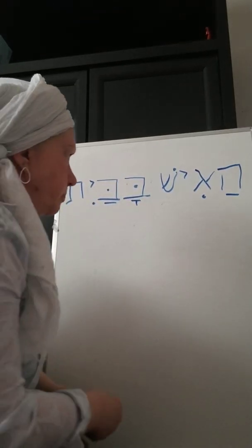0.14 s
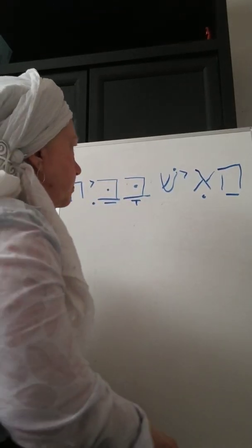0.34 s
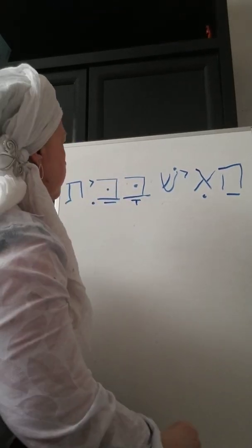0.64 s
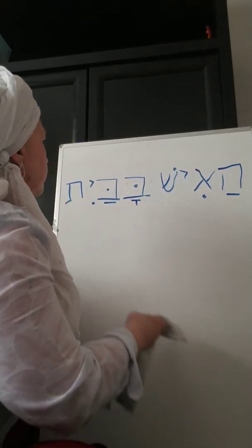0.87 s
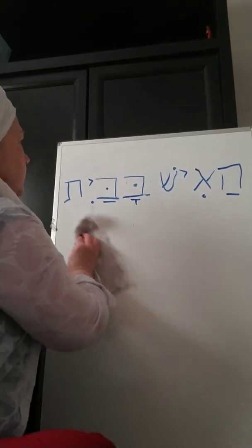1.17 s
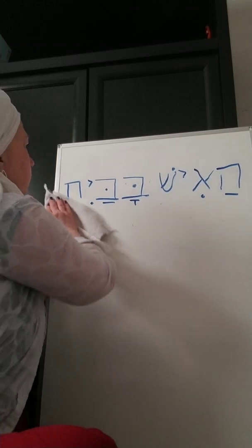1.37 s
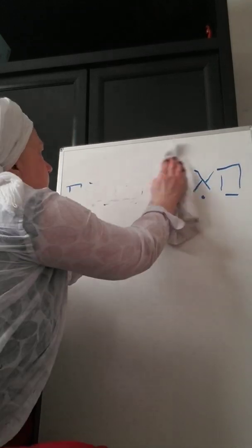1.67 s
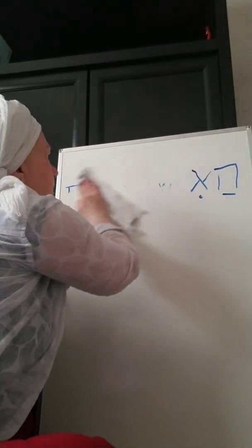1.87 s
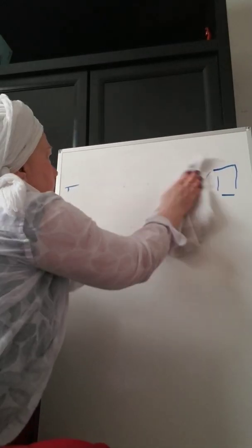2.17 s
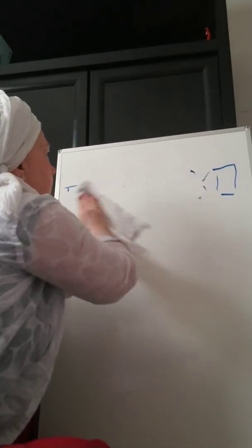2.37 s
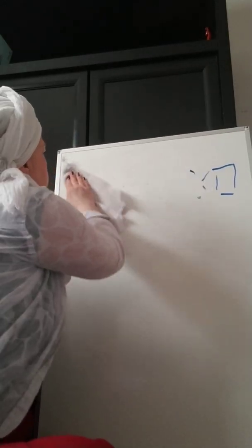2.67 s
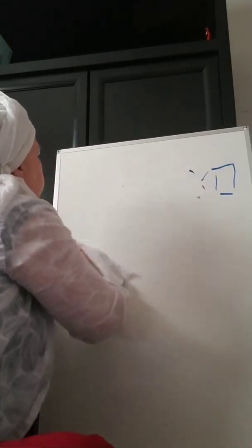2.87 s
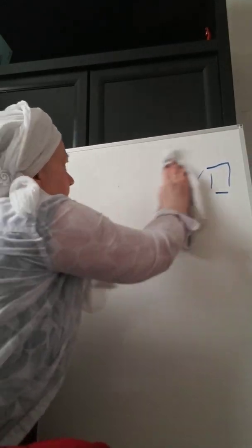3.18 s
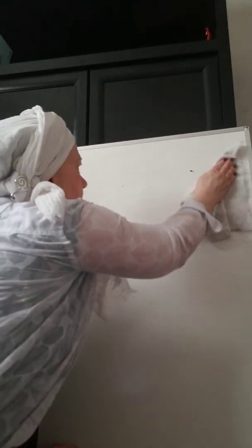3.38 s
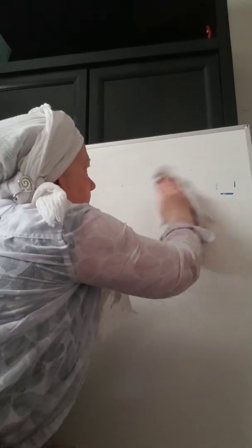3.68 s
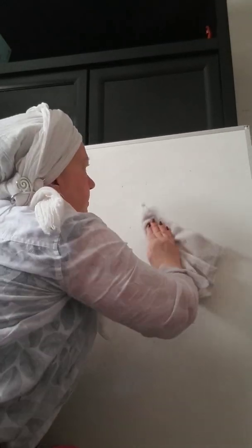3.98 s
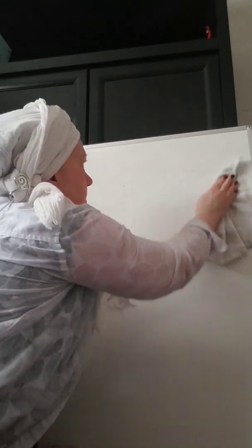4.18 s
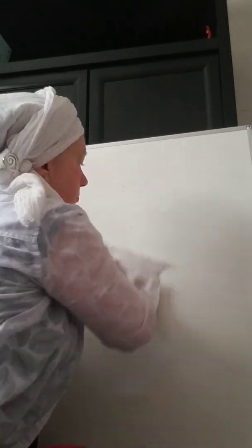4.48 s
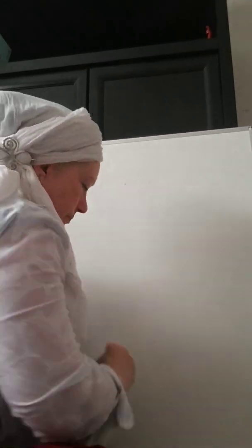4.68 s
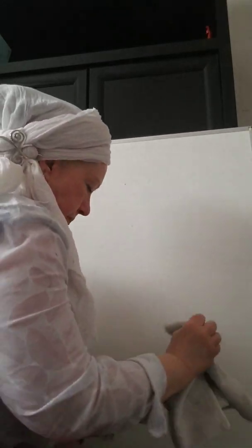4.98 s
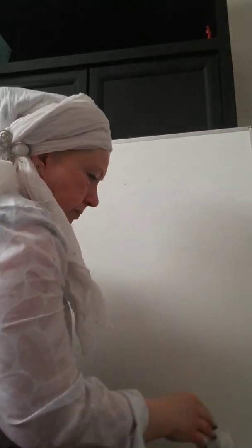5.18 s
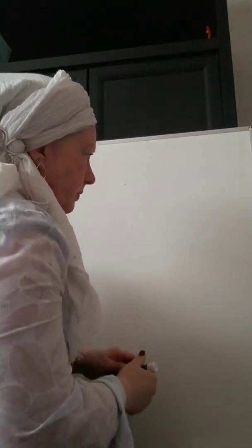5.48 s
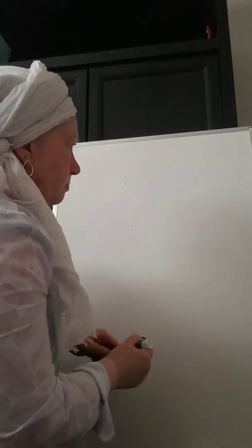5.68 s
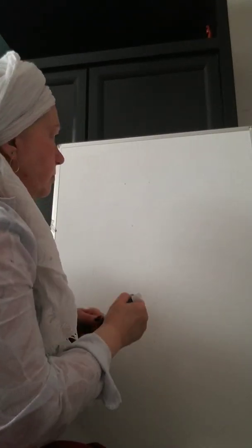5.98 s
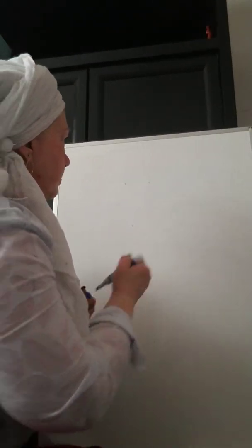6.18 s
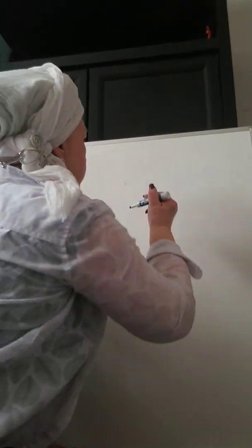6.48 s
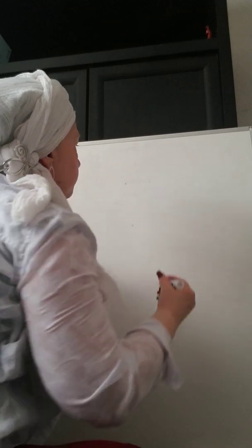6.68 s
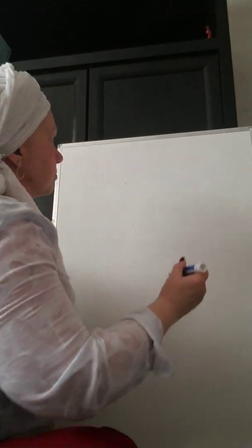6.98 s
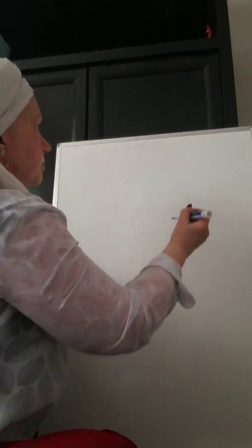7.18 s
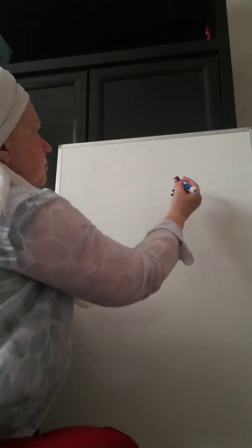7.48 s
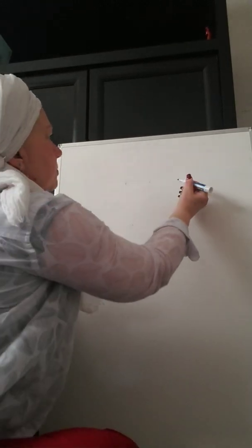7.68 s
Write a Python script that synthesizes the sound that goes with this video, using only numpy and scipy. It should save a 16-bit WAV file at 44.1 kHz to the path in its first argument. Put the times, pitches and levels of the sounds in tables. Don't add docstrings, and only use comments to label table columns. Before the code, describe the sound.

Quick swishing wipes across a hollow, rattling whiteboard in a quiet small room, followed by a dropped cloth, a cap click and felt-tip dabs.

```python
import sys
import numpy as np
from scipy import signal
from scipy.fft import rfft, irfft, next_fast_len
from scipy.io import wavfile
from scipy.ndimage import uniform_filter1d

SR = 44100
rng = np.random.default_rng(int(sys.argv[2]) if len(sys.argv) > 2 else 0)


def dump(signal):
    limited = np.clip(np.atleast_2d(signal).T, -1, 1)
    pcm = np.round(limited * 32767).astype(np.int16)
    wavfile.write(sys.argv[1], SR, pcm)


def ratio(d):
    e = np.asarray(d, float) / 20
    return 10 ** e


N = 346135


def unit(x):
    return x / np.sqrt(np.mean(x ** 2) + 1e-20)


def along(points, hz):
    f, v = np.transpose(points)
    return np.interp(np.log(hz + 1), np.log(f + 1), v)


def closed(points, hz):
    low_end, high_end = (points[0][0] * 0.7, -60), (points[-1][0] * 1.3, -60)
    return ratio(along([low_end, *points, high_end], hz))


def constant(value):
    return lambda f: 0 * f + value


def modes(table, f):
    total = 0
    for k, (center_hz, width_hz, db) in enumerate(table):
        damping = 1j * f * width_hz
        total = total + (-1) ** k * ratio(db) * damping / (center_hz ** 2 - f * f + damping + 1e-9)
    return total


def filtered(x, response):
    m = next_fast_len(x.shape[-1] + 8192)
    spectrum = rfft(x, m) * response(np.fft.rfftfreq(m, 1 / SR))
    return irfft(spectrum, m)[..., :x.shape[-1]]


def plain_noise(gain):
    return unit(filtered(rng.standard_normal((2, N)), gain))


def noise(gain, patchy_db):
    z = signal.stft(rng.standard_normal((2, N)), nperseg=512)[2]
    field = uniform_filter1d(rng.standard_normal(z.shape[1:]), size=6, axis=0)
    field = uniform_filter1d(field, size=8, axis=1)
    patchy = signal.istft(z * ratio(patchy_db * unit(field)), nperseg=512)[1][:, :N]
    return unit(filtered(patchy, gain))


def steady(x, share=0.92):
    power = np.abs(uniform_filter1d(x[0] ** 2, size=SR // 16))
    return unit(x / (power + 0.023) ** (share / 2))


def gestures(s, hold, db, rise, fall, bend=0.):
    grid = np.arange(0, N + 96, 96)
    t = grid[:, None] / SR - s
    before, after = np.maximum(-t, 0), np.maximum(t - hold, 0)
    level_db = db - rise * before - fall * after - bend * (before + after) ** 2
    power = np.sum(ratio(2 * np.maximum(level_db, -140)), axis=1)
    return np.interp(np.arange(N), grid, np.sqrt(power))


def burst(size, gain, t60, swell, crack=0., early=0., blow=0., count=SR // 2):
    hz, t, z = signal.stft(rng.standard_normal((2, count)), SR, nperseg=size)
    decay = ratio(-60 * t / t60(hz)[:, None])
    onset = 1 - np.exp(-(t + 0.00082) / swell(hz)[:, None])
    quick = 1 + early * ratio(-60 * t / 0.06)
    pair = signal.istft(z * decay * onset * quick, SR, nperseg=size)[1][:, :count]
    first = crack * ratio(-60 * np.arange(count) / SR / 0.0025) * rng.standard_normal(pair.shape)
    first[0, SR // 1500] += blow
    highpass = signal.butter(2, 500, "high", fs=SR, output="sos")
    pair = filtered(pair + signal.sosfilt(highpass, first), gain)
    loudness = uniform_filter1d(np.mean(pair ** 2, axis=0), size=SR // 50)
    return pair / np.sqrt(np.max(loudness))


def add(track, s, sound):
    room = track[:, round(s * SR):][:, :sound.shape[1]]
    room += sound[:, :room.shape[1]]


# freq_hz, density_db
HISS = [(1500, -5), (2300, -6), (3300, -9), (4300, -8), (5900, -7), (7500, -8), (8700, -12), (10500, -10),
        (11700, -8), (12300, 0), (13500, -1), (14500, -2.5), (15800, -3)]


def microphone_hiss():
    return ratio(-75 + 3.0) * noise(lambda f: closed(HISS, f), patchy_db=0.8)


# freq_hz, density_db
AIR = [(160, -2.5), (260, 0), (400, -6.5), (700, -8), (1500, -10.5)]


def room_air():
    return ratio(-77.0) * plain_noise(lambda f: closed(AIR, f))


# center_hz, width_hz, level_db
BUILDING = [(29, 12, -10), (50.1, 6, 0), (72, 16, -9.5), (95, 16.2, -4), (132.4, 33, -14.5)]


def building_rumble():
    rumble = plain_noise(lambda f: modes(BUILDING, f) / (1 + (f / 130) ** 4))
    return ratio(-61.5) * steady(rumble, share=0.75)


# start_s, level_db, top_hz, swell_s, t60_s
THUDS = [(0.345, -53, 284, 0.049, 0.36), (1.56, -43, 526, 0.0083, 0.33), (2.549, -65.5, 358, 0.02, 0.37),
         (3.601, -59.5, 450, 0.004, 1), (5.052, -54, 379, 0.029, 0.26), (6.12, -63, 350, 0.0026, 0.15),
         (6.37, -66.5, 485, 0.019, 0.38), (6.469, -58, 690, 0.065, 0.29), (6.73, -64.5, 447, 0.066, 0.25),
         (7.0, -77, 910, 0.081, 1), (7.221, -61.5, 1570, .03, 0.2), (7.36, -58, 800, 0.018, 0.21),
         (7.632, -63.5, 500, 0.011, 0.16)]
# start_s, level_db, center_hz, width_hz, t60_s
FLOP = (4.968, -62, 660, 220, .25)


def pushing():
    out = np.zeros((2, N))
    for s, db, top_hz, swell_s, t60_s in THUDS:
        gain = lambda f: closed([(140, 0), (top_hz, -6), (top_hz * 1.54, -20)], f)
        add(out, s, ratio(db) * burst(230, gain, constant(t60_s), constant(swell_s)))
    s, db, hz, width_hz, t60_s = FLOP
    cavity = lambda f: modes([(hz, width_hz, 0)], f) ** 2
    add(out, s, ratio(db) * burst(128, cavity, constant(t60_s), constant(0.087)))
    return out


# center_hz, width_hz, level_db
BENDING = [(46.75, 5.05, 0.5), (63.1, 11, -1), (95.3, 18, -1.5), (124.75, 13.8, -1.5), (148.3, 16.6, -5.5)]
# start_s, hold_s, boom_db, drum_db
PUSHES = [(0.388, 0.023, -55.5, -49.5), (1.038, 0.03, -48, -47.5), (1.558, 0.01, -34, -33),
          (1.75, 0.14, -44, -46), (2.193, 0.028, -48, -42), (2.29, 0.028, -46.5, -48),
          (2.425, 0.022, -52, -50), (2.634, 0.018, -49.5, -60.5), (2.83, 0.016, -50.5, -58.5),
          (3.06, .02, -52, -41.5), (3.174, 0.018, -46, -58), (3.437, 0.036, -39, -41.5),
          (3.603, 0.025, -49.5, -46.5), (3.785, 0.017, -51, -46), (3.973, 0.0096, -27.5, -29.5),
          (4.142, .02, -45, -45), (4.358, .02, -32.5, -32.5), (4.39, 0.035, -30.5, -36.5),
          (4.566, 0.008, -47, -43), (5.067, 0.015, -59.5, -51.5), (5.138, 0.31, -57.5, -77),
          (5.705, 0.3, -56.5, -68.5), (6.387, 0.037, -55.5, -70), (6.482, .02, -56, -56),
          (6.62, 0.052, -61.5, -71), (6.92, 0.13, -58.5, -70.5), (7.383, 0.032, -67, -55),
          (7.494, 0.18, -54, -60.5), (7.802, 0.043, -54, -61.5)]
# start_s, hold_s, boom_db, drum_db
JOLTS = [
    (1.209, 0.055, -51, -45),
    (1.436, 0.016, -36.5, -34),
    (3.023, 0.038, -39, -43),
    (3.877, 0.052, -35.5, -29),
    (4.308, 0.023, -27, -32),
]
PUSH_RISE_DB_S, JOLT_RISE_DB_S = 174.5, 904.5
BOOM_FALL_DB_S, DRUM_FALL_DB_S = 111, 134


def swaying():
    s, hold, boom_db, drum_db = np.transpose(PUSHES + JOLTS)
    rise = np.repeat([PUSH_RISE_DB_S, JOLT_RISE_DB_S], [len(PUSHES), len(JOLTS)])
    boom = steady(plain_noise(lambda f: modes(BENDING[:2], f) ** 2))
    drum = steady(noise(lambda f: modes(BENDING[2:], f) ** 2, patchy_db=-4.5), share=0.89)
    booming = gestures(s, hold, boom_db + 0.5, rise, BOOM_FALL_DB_S)
    drumming = gestures(s, hold, drum_db, rise, DRUM_FALL_DB_S)
    return booming * boom + drumming * drum


# freq_hz, density_db
CLOTH = [(1060, -29), (1800, -7), (1940, -13), (2660, -6), (3280, -6), (6030, -1.5), (7430, -1.5),
         (8910, -4.5), (10000, -1.5), (11200, -6), (12500, -3.5), (15000, -12), (15800, -18.5)]
# freq_hz, density_db
COARSE = [(150, -6), (500, -1), (1500, -2), (2600, -5), (3700, -13), (5500, -28)]
# full_speed_s, hold_s, hiss_db, rustle_db
STROKES = [(1.091, 0.039, -62.5, -74), (1.259, 0.046, -57.5, -61), (1.42, .02, -60, -68),
           (1.531, 0.081, -52, -56), (1.766, 0.068, -54, -62.5), (2.016, 0.097, -54, -71.5),
           (2.238, 0.081, -55, -72), (2.453, 0.058, -59.5, -85), (2.67, 0.099, -56.5, -83),
           (2.975, 0.071, -55, -67), (3.097, 0.11, -55, -64.5), (3.403, 0.048, -53.5, -68),
           (3.613, 0.11, -56, -72.5), (3.83, 0.077, -54, -76.5), (4.026, 0.056, -55, -82),
           (4.197, 0.081, -58.5, -96)]
# full_speed_s, hold_s, hiss_db, rustle_db
LAST_STROKE = (4.5, 0.1, -56.5, -51)
SHEEN_DB = [0.5, -2, -2.8, -2.5, 1, -0.2, 2.3, -2.8, -1.5, -0.5, -1.8, 3, 3.5, 0.5, 2.5, -1, 2]
# start_s, hold_s, hiss_db, rustle_db
RUSTLES = [(0.971, 0.0071, -67, -69), (5.05, 0.0043, -78, -75), (5.085, 0.026, -74, -86),
           (5.488, 0.074, -73.5, -99), (5.828, 0.0065, -80, -76), (6.149, 0.012, -67, -64.5),
           (6.242, 0.22, -75.5, -77.5), (6.453, 0.0098, -72, -72.5), (6.495, 0.043, -73.5, -72),
           (7.064, 0.077, -75.5, -79), (7.2, 0.03, -76, -70.5), (7.7, 0.026, -71, -86)]
# start_s, hold_s, hiss_db, rustle_db
LIFT = (4.45, .02, -61, -67)
# start_s, hold_s, level_db, rise_db_s, fall_db_s
SLEEVE = (.6, .2, -74, 30, 90)
# start_s, hold_s, hiss_db, rustle_db, fall_db_s
SLAPS = [
    (3.18, 0.058, -68.5, -71, 300),
    (4.296, 0.028, -56.5, -59, 402),
    (4.995, 0.033, -61.5, -71, 260),
    (6.495, 0.083, -74, -56, 330),
    (6.742, 0.048, -75.5, -68, 220),
    (6.804, 0.04, -70, -81, 300),
]
SLAP_RISE_DB_S = [300, 2500, 4000, 350, 150, 400]
STROKE_RISE_DB_S, STROKE_FALL_DB_S = 96, 123.5
STROKE_BEND_DB_S2 = 902.5
FOLD_RISE_DB_S, FOLD_FALL_DB_S = 115, 85
RUSTLE_RISE_DB_S, RUSTLE_FALL_DB_S = 386.5, 99.5
SHEEN_HZ = 8700


def rubbing():
    fine = noise(lambda f: closed(CLOTH, f), patchy_db=1.8)
    coarse = noise(lambda f: closed(COARSE, f), patchy_db=-0.5)
    top = filtered(fine, lambda f: 1 / (1 + (SHEEN_HZ / (f + 1)) ** 6))

    s, hold, hiss_db, fold_db = np.transpose(STROKES + [LAST_STROKE])
    stroke = lambda db: gestures(s, hold, db, STROKE_RISE_DB_S, STROKE_FALL_DB_S, STROKE_BEND_DB_S2)
    wiping = stroke(hiss_db + 2.5) * (fine - top)
    wiping += stroke(hiss_db + 5.5 + np.array(SHEEN_DB)) * top
    folds = gestures(s, hold, fold_db, FOLD_RISE_DB_S, FOLD_FALL_DB_S) * coarse
    sleeve = gestures(*SLEEVE) * fine

    loose_s, loose_hold, loose_hiss_db, loose_fold_db = np.transpose(RUSTLES + [LIFT])
    loose = lambda db: gestures(loose_s, loose_hold, db, RUSTLE_RISE_DB_S, RUSTLE_FALL_DB_S)
    rustling = loose(loose_hiss_db + 6.0) * fine + loose(loose_fold_db) * coarse

    slap_s, slap_hold, slap_db, bunch_db, fall = np.transpose(SLAPS)
    slap = lambda db: gestures(slap_s, slap_hold, db, np.array(SLAP_RISE_DB_S), fall)
    slapping = slap(slap_db + 6.5) * fine + slap(bunch_db) * coarse
    return wiping + folds + sleeve + rustling + slapping


# start_s, peak_db, low_part_rel_db, ringing_hz
CLICKS = [(0.952, -54, -24, 6500), (1.055, -45, -10, 6000), (1.235, -49, -11, 6200),
          (1.419, -41, -20, 6700), (1.494, -44, -16, 6700), (2.154, -61, 22, 5630),
          (3.8594, -31, -5.5, 6670), (3.867, -36, -9.5, 6740), (3.911, -33.5, -7, 6750),
          (3.9354, -38, 0, 6230), (3.9918, -43, -8, 6700), (4.138, -52.5, 11, 7730),
          (4.2898, -37, -8.5, 6850), (4.2973, -39.5, -9, 8500), (4.311, -34, -1.5, 6600),
          (4.359, -61.5, 1, 6700), (4.996, -38.5, -25, 6450), (5.0059, -39, -14.5, 9900),
          (5.097, -60, -17, 8950), (5.448, -53, -42, 6100), (6.1195, -43, 1, 9940),
          (6.2105, -56.5, -42, 9700), (6.458, -48, -28, 6700), (7.201, -56.5, -20, 9700),
          (7.344, -51.5, -11, 9700), (7.6073, -57, -31, 6500), (7.8008, -36.5, -30, 5360),
          (7.8072, -34, -15, 9700), (7.8083, -42, -13, 4900), (7.8104, -39, -24, 9000),
          (7.8222, -61.5, -16, 8000)]
# freq_hz, density_db
TICK = [(3000, -8.5), (5200, -3), (8000, -5.5), (12500, -7.5), (15800, -19.5)]
# center_hz, width_hz, level_db
CAP = [(620, 200, -2.5), (1607, 204, -0.5), (2080, 610, -0.5), (2760, 800, 0), (4070, 1300, -6)]
CLICK_ROOM_DB, CLICK_T60_S = -12, 0.21
HOLLOW_ROOM = 0.045


def clicking():
    out = np.zeros((2, N))
    for s, db, low_db, hz in CLICKS:
        broad = lambda f: closed(TICK, f) + ratio(low_db + 14.5) * modes(CAP, f) ** 2
        pitched = lambda f: broad(f) + 1.7 * modes([(hz, 1300, 0)], f) ** 2
        tick = burst(32, pitched, constant(0.014), constant(0.00056), crack=2.0, count=SR // 16)
        add(out, s, ratio(db - 7.0 + np.clip(low_db, 0, 7)) * tick)
        answer = burst(70, broad, constant(CLICK_T60_S), constant(0.005), count=SR // 8)
        add(out, s, ratio(db + CLICK_ROOM_DB + HOLLOW_ROOM * low_db) * answer)
    return out


# start_s, peak_db, bass_rel_db, body_rel_db, edge_rel_db
KNOCKS = [(0.985, -47.5, 3.5, -0.5, -10), (1.018, -51, -2, 3, -6), (1.055, -45.5, -5.5, -9, -11),
          (1.193, -52, -5, -3.5, -15), (1.199, -42.5, 0, -7, -22), (1.292, -47, -12, -5, -2),
          (1.42, -30.5, 3.5, -9, -10), (1.494, -28.5, -9.5, 0, -19.5), (1.507, -25, -6, -12.5, -17.5),
          (1.763, -34, -3, -16, -36), (1.775, -34.5, 0.5, -16, -29), (2.1543, -41, -9, -7, -12.5),
          (2.241, -35.5, -0.5, -12.5, -40), (2.9877, -39, 0, -4, -14), (3, -33, 3.5, -9, -27),
          (3.392, -37.5, 2.5, -14, -34), (3.416, -32, -5.5, -8.5, -20.5), (3.859, -20.5, 0, -8.5, -20),
          (3.91, -21.5, -2.5, 5, -24.5), (3.929, -21, -7.5, -5.5, -14.5), (3.946, -28, 0.5, -13.5, -20),
          (3.991, -29, -2.5, -8.5, -13.5), (4.012, -36.5, 1.5, -9.5, -22.5), (4.289, -24.5, 0, -11, -19),
          (4.3, -22.5, -1, 1.5, -12.5), (4.316, -31, -2, -1, -13), (4.342, -27, -4, -15, -26),
          (4.362, -28, -3, -5.5, -23), (4.384, -27.5, -1, -11, -27), (4.433, -34, -7, -12, -31),
          (1.426, -34.5, -4, -1, -9), (1.526, -32, 3.5, -6, -12), (1.588, -42.5, 5.5, -10.5, -22),
          (2.283, -48, -4, -11, -32)]
# start_s, peak_db, bass_rel_db, body_rel_db, edge_rel_db
REBOUNDS = [
    (4.138, -40, -7, 1.5, -11.5),
    (4.216, -36.5, 0.5, -16, -26.5),
]
# start_s, peak_db, bass_rel_db, body_rel_db, edge_rel_db
TAPS = [
    (7.7992, -42.5, -2, 0.5, 1.5),
    (7.822, -44, -1, -6, -8),
]
# center_hz, width_hz, level_db
BOARD = [(192, 110, 0), (251.1, 8.7, 13.5), (359, 13, -1), (397.5, 12, 6.5), (410, 4.5, -1.5),
         (497.5, 30, 8), (620, 8.4, -18), (727, 39, 7.5), (800, 28, -8), (1007, 22, -1), (1052, 46, 1.5),
         (1228, 18, 11), (1390, 96, -7.5), (1516, 5.5, 8.5), (1720, 42, -14)]
# freq_hz, t60_s
RING = [(150, 1), (300, 0.32), (700, 0.78), (1500, 0.53), (4000, 1)]
# freq_hz, swell_s
SWELL = [(150, 0.0023), (500, 0.0013), (2000, 0.001)]
DAMPED_SHARE = 0.28
RING_SHARE, RING_GROWTH_PER_DB = 0.48, 0.004


def knocking():
    out = np.zeros((2, N))
    for k, (s, db, bass_db, body_db, edge_db) in enumerate(KNOCKS + REBOUNDS + TAPS):
        share = RING_SHARE + RING_GROWTH_PER_DB * (db + 52.5)
        if k >= len(KNOCKS):
            share = DAMPED_SHARE
        contact = [(100, bass_db - 23.0), (190, bass_db + 5.5), (450, 4.0), (1050, body_db - 5.0),
                   (1700, (body_db + edge_db) / 2 - 0.5), (2600, edge_db - 6.5),
                   (5000, edge_db - 22.0), (9000, -56.0)]
        gain = lambda f: ratio(along(contact, f)) * (0.5 + 0.41 * modes(BOARD, f))
        knock = burst(128, gain, lambda f: share * along(RING, f), lambda f: along(SWELL, f),
                      crack=1.6, early=1.0, blow=25, count=SR // 3)
        add(out, s, ratio(db - 6.0 + max(bass_db, 0)) * knock)
    return out


# start_s, level_db, center_hz, width_hz, t60_s
RINGS = [(1.056, -55, 1490, 400, 0.097), (1.42, -43.5, 1450, 350, 0.12), (1.421, -50, 2300, 720, 0.13),
         (1.48, -44.5, 1280, 400, 0.09), (1.507, -27.5, 370, 150, 0.13), (3.861, -29.5, 380, 180, 0.073),
         (3.865, -38, 800, 250, .1), (4.3, -28, 360, 161, .12), (2.154, -62, 1580, 400, .05),
         (3.861, -34.5, 1390, 300, 0.077), (3.866, -41.5, 3200, 600, 0.055), (3.912, -35, 1160, 400, .08),
         (3.991, -40.5, 1400, 300, .07), (4.137, -49, 1620, 500, 0.05), (4.29, -43, 1230, 500, .05),
         (4.3, -37, 1240, 400, 0.11), (6.12, -67, 720, 198, 0.25), (6.12, -59, 1570, 350, 0.18),
         (6.12, -51, 2400, 700, 0.23), (1.4, -47.5, 6500, 500, .03), (1.4, -48.5, 6600, 500, .03),
         (1.53, -53.5, 6460, 500, .03), (1.503, -54, 6600, 500, .03), (4.358, -51, 6500, 500, .03),
         (6.2105, -55.5, 9700, 1500, .03), (6.12, -59, 6000, 1500, .04), (6.464, -58, 6000, 2500, .18),
         (4.4, -65, 6800, 2500, .2), (2.988, -59, 1500, 700, .15), (3.416, -55, 1100, 600, .08),
         (4.139, -50.5, 2030, 1800, .025), (3.861, -41.5, 6700, 470, .04), (3.992, -49, 6700, 500, .04),
         (3.918, -47.5, 7000, 700, .03), (1.51, -40.5, 1300, 700, 0.13), (1.424, -43.5, 1200, 900, .15),
         (1.766, -51.5, 1040, 600, 0.17), (1.195, -59, 1230, 900, 0.16), (3.002, -54, 1000, 600, 0.2)]


def ringing():
    out = np.zeros((2, N))
    for s, db, hz, width_hz, t60_s in RINGS:
        gain = lambda f: modes([(hz, width_hz, 0)], f) ** 2
        ring = burst(64, gain, constant(t60_s), constant(0.0011), blow=15, count=SR // 6)
        add(out, s, ratio(db) * ring)
    return out


# freq_hz, density_db
FELT = [(880, -39), (1500, -15), (2000, -14.5), (2550, -13), (4300, -11), (5730, -4.5), (8490, -7.5),
        (9700, 1.5), (11000, -8), (13000, -6), (14900, -12), (15800, -19)]
# start_s, hold_s, hiss_db, fall_db_s
DRAGS = [
    (7.2025, .004, -57, 300),
    (7.211, 0.0034, -48.5, 300),
    (7.365, 0.022, -53, 171),
    (7.249, 0.0076, -55.5, 223),
    (7.346, 0.01, -52.5, 151),
    (7.295, .05, -71, 100),
    (6.7, .08, -70, 98),
    (7.613, 0.036, -58, 100),
    (7.676, 0.062, -58, 332),
    (7.808, 0.0046, -64, 143.5),
]
DRAG_RISE_DB_S = 2503.5


def writing():
    s, hold, db, fall = np.transpose(DRAGS)
    felt = noise(lambda f: closed(FELT, f), patchy_db=1.2)
    return gestures(s, hold, db, DRAG_RISE_DB_S, fall) * felt


# freq_hz, correlation
ALIKE = [(60, 1), (300, 1), (700, 0.94), (1200, 0.13), (4000, 0.14), (15000, 0.25)]
# freq_hz, level_db
LEAN = [(60, 3.1), (110, 2.6), (200, 2.6), (380, 3.4), (700, -0.3), (1290, -2.5), (2380, 0.3), (4400, 2.4),
        (8120, -0.5), (15000, 0.5)]
# freq_hz, phase_rad
LEAD = [(0, 1.5), (200, 0), (400, 0.52), (780, 0.72), (1210, 0.4), (2330, 2), (3700, 2.5), (6200, 1),
        (7320, 7), (7840, 6), (8700, 11), (9390, 10.5), (10600, 13.5), (12400, 21), (13000, 20.5),
        (15900, 34)]


def ports(pair):
    turn = lambda f: np.arccos(np.clip(along(ALIKE, f), 0, 1)) / 2
    mid, side = filtered(pair, lambda f: np.array([np.cos(turn(f)), np.sin(turn(f))]))
    half = lambda f: ratio(along(LEAN, f) / 2) * np.exp(0.5j * along(LEAD, f))
    return filtered(np.array([mid + side, mid - side]), lambda f: np.array([half(f), 1 / half(f)]))


def scene():
    background = room_air() + building_rumble()
    board = pushing() + swaying() + clicking() + knocking() + ringing()
    return ports(background + board + rubbing() + writing()) + microphone_hiss()


def band_limit(x):
    return signal.sosfilt(signal.butter(12, 16330, fs=SR, output="sos"), x)


def record(dry):
    top_hz = 15810
    mix = filtered(dry, lambda f: f < top_hz)
    return band_limit(mix)


dry = scene()
out = record(dry)
dump(out)
```